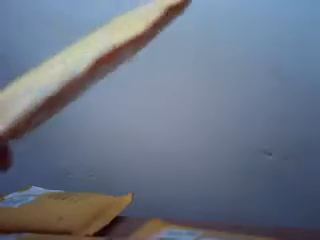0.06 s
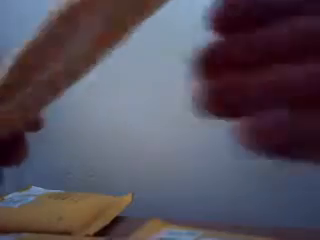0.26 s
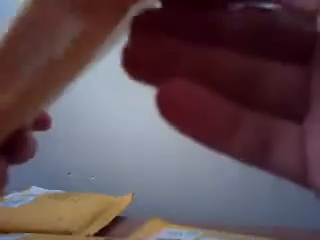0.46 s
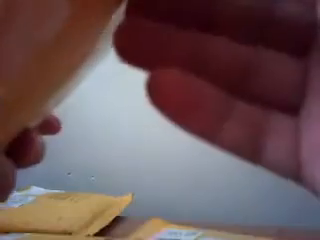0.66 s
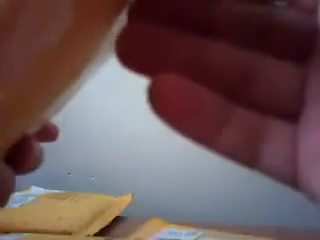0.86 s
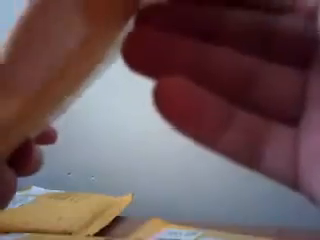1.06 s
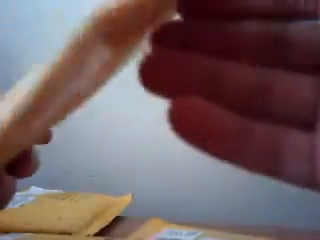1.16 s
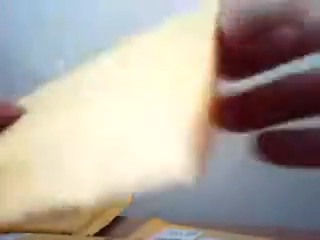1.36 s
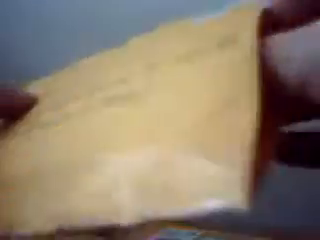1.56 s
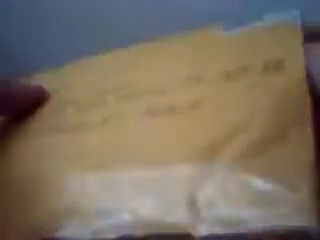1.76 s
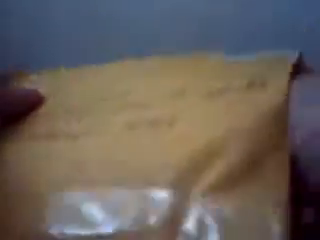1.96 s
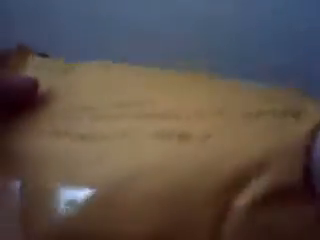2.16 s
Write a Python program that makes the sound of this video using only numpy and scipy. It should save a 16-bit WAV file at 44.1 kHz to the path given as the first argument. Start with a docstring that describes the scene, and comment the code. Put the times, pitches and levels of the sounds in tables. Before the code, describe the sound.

A padded paper mailer rips sharply, then crinkles and snaps in hands close to the microphone.

```python
"""A quiet room: hands tear and crumple a padded paper mailer close to a small camera.
Creases snap as clicks and short rattles that ring the sheet; fibres crackle as clumped ticks over a rub.
A rip is a few hard noise bursts with trails; decaying sines are the puffs of air the mailer pushes.
A faint far motor hums in sine orders, rising in pitch as its main one fades, over steady noise.
Sparse echoes make the room, and the loudest peaks overload the input."""
import sys
import numpy as np
from scipy import signal
from scipy.io import wavfile
from scipy.ndimage import uniform_filter1d

SR = 44100
rng = np.random.default_rng(int(sys.argv[2]) if len(sys.argv) > 2 else 0)


def wrap_up_sound(samples):
    """Save the sound to the file named by the first command line argument, as 16-bit audio."""
    columns = np.atleast_2d(samples).T
    # keep every value between -1 and 1, then stretch to whole-number steps
    tamed = np.clip(columns, -1, 1)
    steps = np.round(tamed * 32767).astype(np.int16)
    wavfile.write(sys.argv[1], SR, steps)


def volts_from_decibels(level):
    """Turn decibel levels (scalar or array-like) into linear amplitude factors."""
    exponent = np.asarray(level, float) / 20
    return 10 ** exponent


N = 97020  # 2.2 s


def read(points, hz):
    """A table of (Hz, value) read on a log-frequency axis."""
    f, value = np.transpose(points)
    return np.interp(np.log(hz + 1), np.log(f + 1), value)


def evened(x):
    """Scaled to rms 1."""
    return x / np.sqrt(np.mean(x ** 2) + 1e-20)


def colour(x, points):
    """Causal minimum-phase filter shaped by a spectrum table, scaled to unit energy."""
    size = 4096
    gain_db = np.maximum(read(points, abs(np.fft.fftfreq(size, 1 / SR))), -70)
    log_gain = np.log(volts_from_decibels(gain_db))
    taps = np.fft.ifft(np.exp(np.conj(signal.hilbert(log_gain)))).real[:size // 2]
    return signal.oaconvolve(x, taps / np.linalg.norm(taps))[:len(x)]


def halves(x):
    """The sound below and above a split in the mids."""
    split_hz = 2870
    low = signal.sosfilt(signal.butter(4, split_hz, "low", fs=SR, output="sos"), x)
    high = signal.sosfilt(signal.butter(4, split_hz, "high", fs=SR, output="sos"), x)
    return low, high


def ring(x, hz, width):
    """Two-pole resonance at hz, with its bandwidth in Hz."""
    r = np.exp(-np.pi * width / SR)
    return signal.lfilter([1, -1], [1, -2 * r * np.cos(2 * np.pi * hz / SR), r * r], x)


def add(mix, s, sound):
    """Mixes a sound in at time s."""
    part = mix[round(s * SR):][:len(sound)]
    part += sound[:len(part)]


def hum():
    """A far motor speeds up a little; its strong third order fades, the others stay faint and waver."""
    # third order of the motor: start_s, pitch_hz, level_db [rms]
    third_order = [(0, 175.9, -57), (.3, 178.8, -54), (.47, 179.2, -59.5), (.85, 186.2, -67.5),
                   (1.098, 194.4, -88.5)]
    # its other orders: multiple of the turning rate, level_db [rms]
    other_orders = [(1, -78.5), (2, -74)]
    s, hz, db = np.transpose(third_order)
    t = np.arange(N) / SR
    turns = np.cumsum(np.interp(t, s, hz)) / SR / 3
    faint = np.zeros(N)
    for order, order_db in other_orders:
        waver = 1 + 0.088 * evened(uniform_filter1d(rng.standard_normal(N), 4000))
        faint += volts_from_decibels(order_db) * waver * np.sin(2 * np.pi * order * turns)
    strong = volts_from_decibels(np.interp(t, s, db)) * np.sin(2 * np.pi * 3 * turns)
    return np.sqrt(2) * (strong + faint)  # rms to peak


def air():
    """Steady room and input noise, shaped in short spectra with faint drifting patches."""
    # noise spectrum: pitch_hz, relative level_db
    air_spectrum = [(12, -37), (20, -12), (117, -6.5), (248, -7.5), (800, -13), (1320, -17.5),
                    (5900, -19.5), (6500, -38.5), (8450, -74), (14300, -120)]
    level_db, patchy_db = -63, 1.5  # both rms
    frames, hz = N // 256 + 5, np.fft.rfftfreq(1024, 1 / SR)
    real, imaginary, patches = rng.standard_normal((3, 513, frames))
    # smoothed over 10 frequency bins, then 12 frames
    patches = evened(uniform_filter1d(uniform_filter1d(patches, 10, 0), 12, 1))
    gain = volts_from_decibels(read(air_spectrum, hz)[:, None] + patchy_db * patches)
    noise = signal.istft((real + 1j * imaginary) * gain, nperseg=1024, noverlap=768)[1][:N]
    return volts_from_decibels(level_db) * evened(noise)


def crackle():
    """Fibres tick in clumps at twelve pitches over the rub of fingers; both follow the handling."""
    # handling: start_s, upper crackle level_db, lower crackle level_db
    handling = [(0, -67.5, -64.5), (.17, -53.5, -58), (0.195, -57, -48), (0.205, -36, -43.5),
                (.225, -70, -64), (.36, -70, -75.5), (.61, -65, -66.5), (.665, -48, -49.5),
                (0.692, -65, -66.5), (0.781, -66, -58.5), (0.83, -68, -71), (.93, -74.5, -67),
                (0.969, -55, -59), (1.041, -71, -69), (1.319, -72.5, -68), (1.369, -51, -59),
                (1.442, -70.5, -63), (1.509, -43.5, -48.5), (1.574, -57, -52.5), (1.622, -47, -39),
                (1.694, -51, -54), (1.727, -36.5, -42.5), (1.759, -46.5, -53), (1.799, -38, -46.5),
                (1.873, -45.5, -50.5), (1.936, -68, -67.5), (1.975, -64, -33), (2.0, -49, -54),
                (2.099, -42.5, -49.5), (2.132, -33.5, -45), (2.179, -42, -39), (2.2, -33, -34)]
    # crackle spectrum: pitch_hz, relative level_db
    crackle_spectrum = [(120, -64.5), (200, -17.5), (599, -17.5), (800, -15), (1990, -11), (3220, -10),
                        (5220, 3.5), (6320, 1), (6600, -25.5), (14500, -120)]
    clump_db, rub_share = 3, 0.65  # rub as rms against the grains
    grains_per_s, grain_spread_db, grain_t60_s = 2000, 4.5, .004
    lowest_hz, highest_hz, kinds = 1304, 5860, 12
    clumps = volts_from_decibels(clump_db * evened(uniform_filter1d(rng.standard_normal(N), 250)))
    starts = rng.random(N) < grains_per_s / SR
    size = volts_from_decibels(grain_spread_db * np.minimum(rng.exponential(1, N), 3)) * starts
    kind = rng.integers(0, kinds, N)
    tail = volts_from_decibels(-60 * np.arange(600) / SR / grain_t60_s)
    grains = np.zeros(N)
    for k, hz in enumerate(np.linspace(lowest_hz, highest_hz, kinds)):
        tick = ring(tail * rng.standard_normal(600), hz, hz)  # as wide as its pitch
        grains += signal.oaconvolve(size * (kind == k), tick / np.linalg.norm(tick))[:N]
    rub = rub_share * rng.standard_normal(N)
    low, high = halves(colour(clumps * (evened(grains) + rub), crackle_spectrum))
    s, db, low_db = np.transpose(handling)
    t = np.arange(N) / SR
    upper = volts_from_decibels(np.interp(t, s, db)) * evened(high)
    return upper + volts_from_decibels(np.interp(t, s, low_db)) * evened(low)


def snaps():
    """Each crease creaks briefly, then gives a click and a dying rattle that ring the sheet high and low."""
    # creases: start_s [of the click], upper ring peak level_db, upper ring pitch_hz,
    # lower ring peak level_db, rattle t60_s [before ringing]
    creases = [(0.0934, -39, 4200, -50, 0.015), (0.1256, -31.5, 3840, -47.5, 0.0088),
               (0.1629, -26.5, 4910, -41, 0.0098), (0.178, -17, 4280, -38, 0.011),
               (0.1988, -18.5, 4250, -35.5, 0.013), (0.2031, -41.5, 4380, -25, 0.017),
               (0.494, -38.5, 5000, -37, 0.02), (0.5464, -38.5, 5275, -47.5, 0.014),
               (0.627, -37.5, 4360, -52, 0.01), (0.7743, -19, 4530, -51.5, 0.015),
               (0.8677, -42, 4725, -49, 0.012), (0.9031, -28, 4660, -49.5, 0.0031),
               (0.9567, -32, 4906, -51, 0.012), (0.9661, -25.5, 4700, -60, 0.0054),
               (0.9748, -33, 4970, -61, 0.01), (1.004, -30, 4800, -37, 0.014),
               (1.0277, -36, 4430, -47.5, 0.012), (1.1565, -33, 4780, -34.5, 0.02),
               (1.1626, -36.5, 4940, -45, .02), (1.1853, -30.5, 4900, -38.5, 0.013),
               (1.2109, -26, 4530, -48, 0.014), (1.2285, -40, 4614, -44, 0.015),
               (1.2499, -27.5, 4280, -50, 0.013), (1.3245, -35, 5130, -65.5, 0.012),
               (1.342, -26.5, 4830, -48, 0.012), (1.348, -31.5, 4790, -46.5, 0.014),
               (1.507, -27, 5000, -58, 0.011), (1.5213, -36, 4600, -36.5, .012),
               (1.5792, -25.5, 5728, -50, 0.016), (1.6021, -8.5, 4290, -20, 0.014),
               (1.6156, -13, 5490, -23, 0.018), (1.6197, -16.5, 4250, -19.5, 0.026),
               (1.6255, -20, 5830, -23.5, 0.0097), (1.6541, -19, 5100, -27.5, 0.041),
               (1.7229, -25, 5300, -37.5, 0.02), (1.7335, -20.5, 5216, -41, 0.0087),
               (1.7691, -28.5, 4600, -40.5, 0.012), (1.7868, -22.5, 4850, -48, 0.0093),
               (1.7944, -21, 4420, -26, 0.012), (1.8085, -26, 5250, -43, 0.014),
               (1.847, -22.5, 4930, -42.5, 0.017), (1.8874, -25, 5070, -45, 0.02),
               (1.9484, -2, 6230, -12.5, 0.019), (1.9762, -21, 4000, -26, 0.0053),
               (1.9804, -18.5, 3800, -32.5, 0.011), (2.0436, -28, 4800, -55, 0.0098),
               (2.063, -29, 5360, -48, 0.0078), (2.0804, -25, 4330, -43.5, 0.0095),
               (2.1634, -22, 5270, -51, .006), (2.1674, -16, 5680, -30, 0.01),
               (2.1751, -20.5, 3430, -21.5, 0.035), (2.1831, -23, 4460, -35, 0.005)]
    # lower ring of the sheet, before stiffness and body: pitch_hz, relative level_db
    sheet_ring = [(70, -53), (120, -19.5), (450, -9.5), (850, 2.5), (1300, -11), (2000, 5), (2700, -9.5),
                  (3600, -12.5), (7040, -120)]
    click_share, creak_db, creak_s = .45, -20, 0.0031
    upper_width_hz, skirt_hz, skirt_db = 1480, 3900, -5
    stiff_hz, stiff_share = 4700, .35  # a tighter crease lifts the lower ring along with the upper
    body_hz, body_db_per_db = 1000, .3  # harder snaps move more of the sheet: more body below this
    out, lead = np.zeros(N), 300  # samples of creak ahead of the click
    t = (np.arange(2400) - lead) / SR
    creak = volts_from_decibels(creak_db) * np.exp(-abs(t) / creak_s)
    for s, db, hz, low_db, t60 in creases:
        noise = rng.standard_normal(2400)
        rattle = volts_from_decibels(-60 * t.clip(0) / max(t60, .002))
        kick = noise ** 2 * np.sign(noise) * np.where(t < 0, creak, rattle)  # squaring makes it spiky
        kick = (1 - click_share) * kick / np.linalg.norm(kick) + click_share * (t == 0)
        twice = ring(ring(kick, hz, upper_width_hz), hz, upper_width_hz)
        skirt = ring(kick, skirt_hz, skirt_hz)
        high = evened(twice) + volts_from_decibels(skirt_db) * evened(skirt)
        stretch = (hz / stiff_hz) ** stiff_share
        body_db = body_db_per_db * low_db
        low = colour(kick, [(f * stretch, d + (f < body_hz) * body_db) for f, d in sheet_ring])
        snap = volts_from_decibels(db) * high / abs(high).max() + volts_from_decibels(low_db) * low / abs(low).max()
        add(out, s - lead / SR, snap)
    return out


def pushes():
    """The mailer flexes and pushes air: low puffs, each a sine dying within a few cycles."""
    # puffs: start_s, level_db [sine peak before decay], pitch_hz, cycles until it falls to 1/e
    puffs = [(0.207, -31, 138.4, 0.51), (1.614, -43, 87, 1.2), (1.947, -46.5, 240, 4.2)]
    out = np.zeros(N)
    for s, db, hz, cycles in puffs:
        u = np.arange(0, 4 * cycles, hz / SR)  # time in cycles
        add(out, s, volts_from_decibels(db) * np.sin(2 * np.pi * u) * np.exp(-u / cycles))
    return out


def rip():
    """Fibres give way in a few hard cracks, each a sharp burst with a rattling trail."""
    # cracks: start_s, level_db [rms of the first 100 samples], burst t60_s, lower part gain_db
    cracks = [(0.2095, -6, 0.059, 4), (0.2347, -19, 0.042, 5), (0.2517, -8.5, 0.027, 0),
              (0.2685, -12.5, 0.0078, 6), (0.2799, -26, 0.046, 23)]
    # ring of the tearing paper: pitch_hz, relative level_db
    rip_ring = [(200, -25), (400, -17), (900, -17), (1300, -12), (1880, -3), (2300, -11), (3000, -17),
                (3400, -4), (4200, -2), (4750, -9), (5350, 0), (6300, -19)]
    click_db = 13
    trail_db, trail_t60_s = -17, 0.083  # the torn flap keeps rattling
    out, t = np.zeros(N), np.arange(9000) / SR
    for s, db, t60, low_db in cracks:
        shape = volts_from_decibels(-60 * t / t60) + volts_from_decibels(trail_db - 60 * t / trail_t60_s)
        crack = shape * rng.standard_normal(9000) + volts_from_decibels(click_db) * (t == 0)
        low, high = halves(colour(crack, rip_ring))
        burst = high + volts_from_decibels(low_db) * low
        add(out, s, volts_from_decibels(db) * burst / np.sqrt(np.mean(burst[:100] ** 2)))
    return out


def room(x):
    """Sparse echoes of random sign, each band dying at its own speed."""
    # decay of the room: pitch_hz, t60_s
    room_decay = [(400, 0.23), (2000, 0.4), (4000, 0.29), (6500, 0.3)]
    taps = np.zeros(SR // 2)
    at = np.arange(200, SR // 2 - 20, 20)  # one echo in every 20 samples
    taps[at + rng.integers(0, 20, at.shape)] = rng.choice([-1., 1.], at.shape)
    hz, t, z = signal.stft(taps, SR, nperseg=256)
    decay = volts_from_decibels(-60 * t / read(room_decay, hz)[:, None])
    tail = signal.istft(z * decay, SR, nperseg=256)[1]
    return signal.fftconvolve(x, tail / np.linalg.norm(tail))[:N]


def scene():
    """Paper, its room, the hum and the air; the rip fills the room more than the small sounds by the camera."""
    rip_room_db, near_room_db = -15, -21
    steady = hum() + air()
    near = crackle() + snaps() + pushes()
    torn = rip()
    echoes = room(volts_from_decibels(rip_room_db) * torn + volts_from_decibels(near_room_db) * near)
    return (torn + near + echoes + steady)[None]


def band_limit(x):
    """A steep low-pass at the top of the band."""
    return signal.sosfilt(signal.butter(12, 16460, fs=SR, output="sos"), x)


def record(dry):
    """A narrow-band input: a steep low-pass, then hard clipping of the loudest peaks."""
    edge_hz, clip = 6200, .74  # clip as a share of full scale
    low_pass = signal.firwin(511, edge_hz, window=("kaiser", 10), fs=SR)
    narrow = signal.oaconvolve(dry, low_pass[None], "same")
    return band_limit(np.clip(narrow, -clip, clip))


dry = scene()
out = record(dry)
wrap_up_sound(out)
```